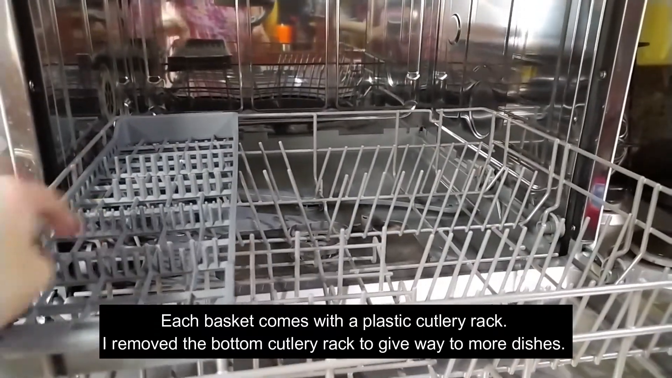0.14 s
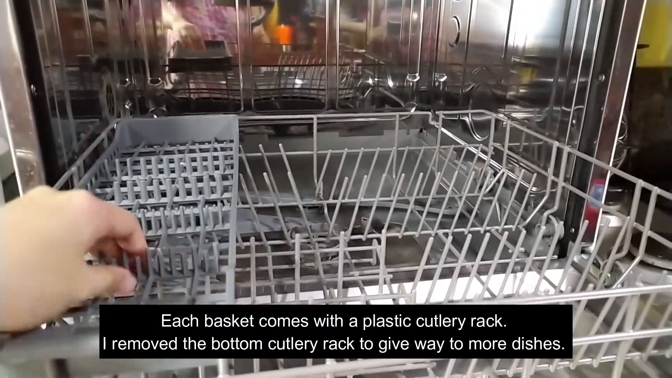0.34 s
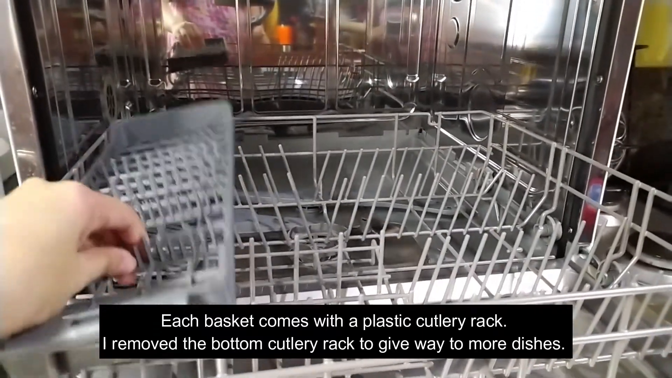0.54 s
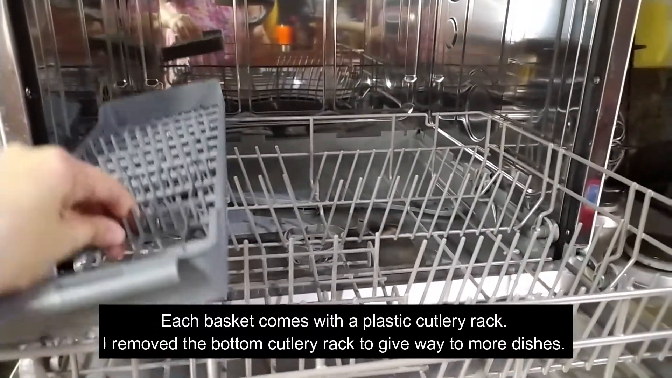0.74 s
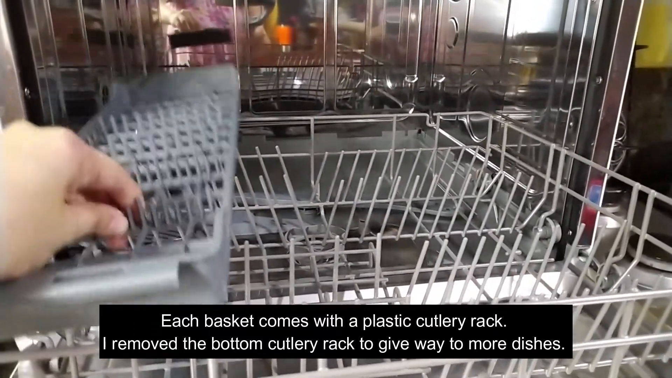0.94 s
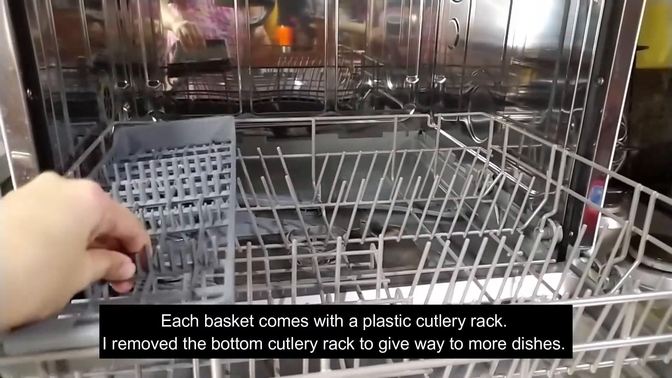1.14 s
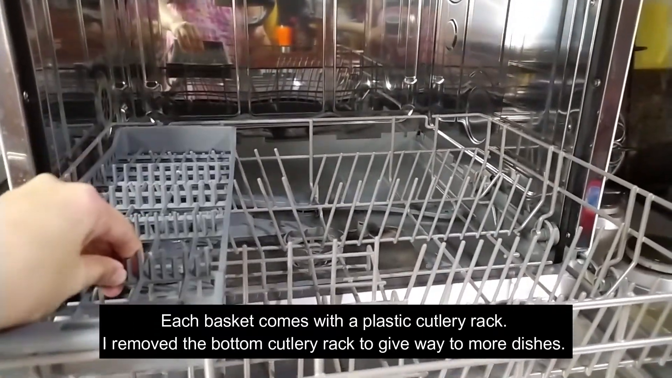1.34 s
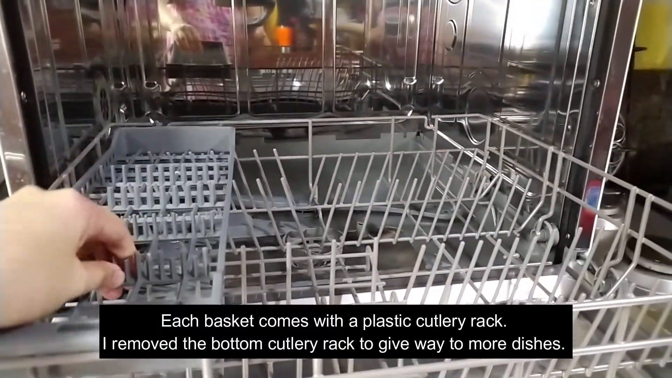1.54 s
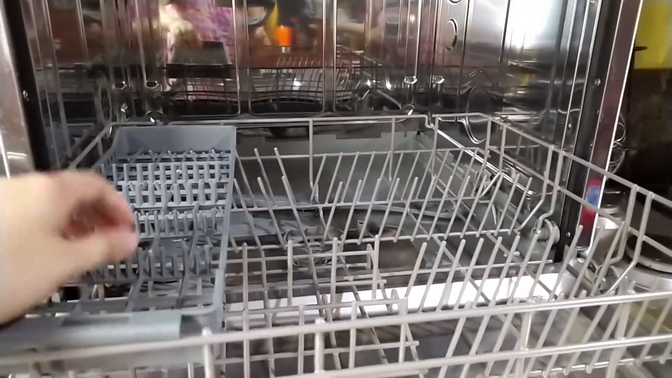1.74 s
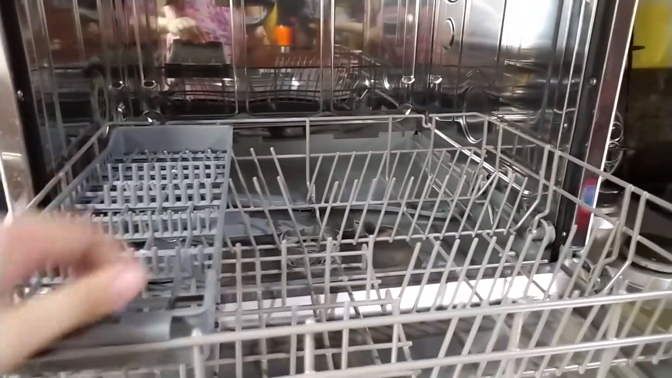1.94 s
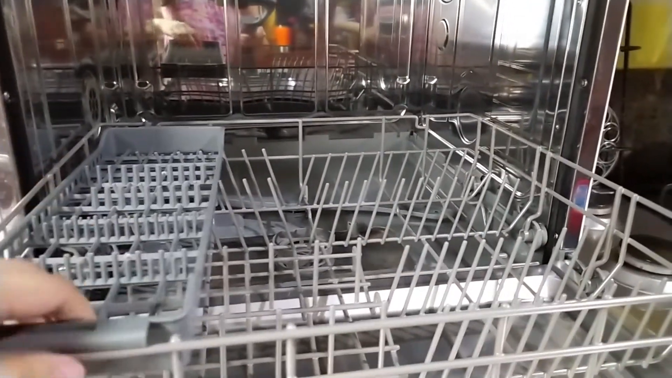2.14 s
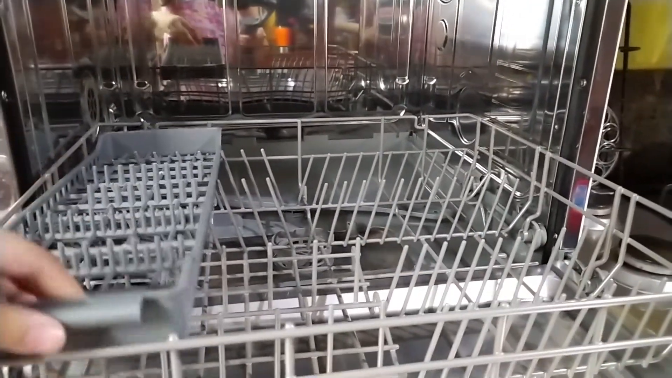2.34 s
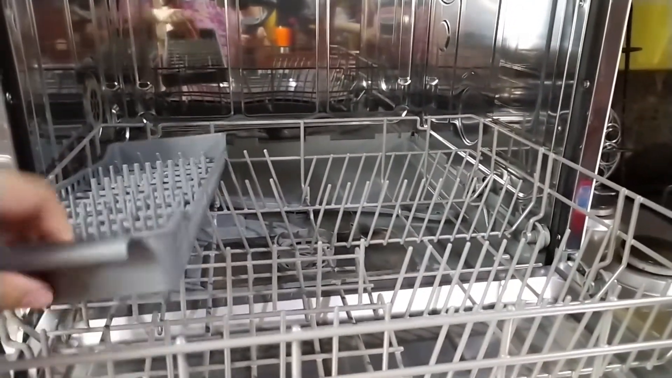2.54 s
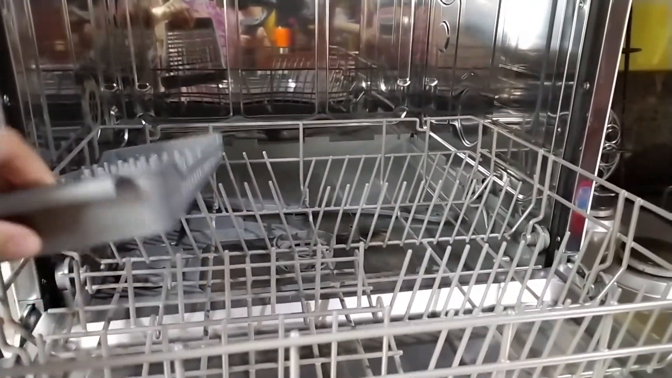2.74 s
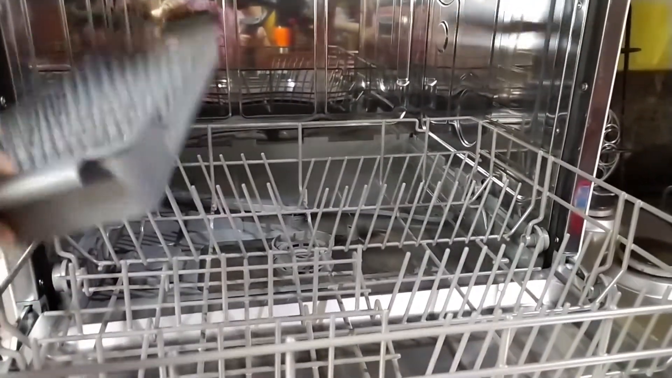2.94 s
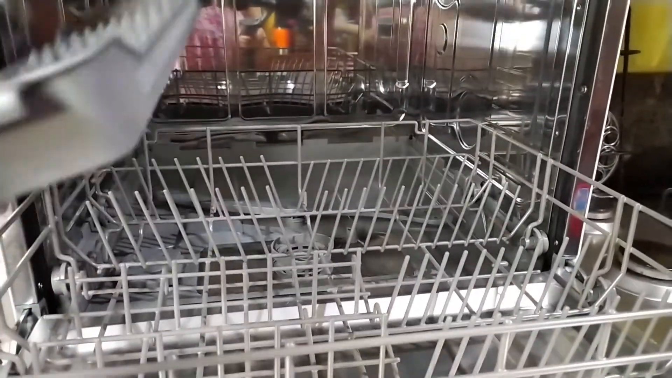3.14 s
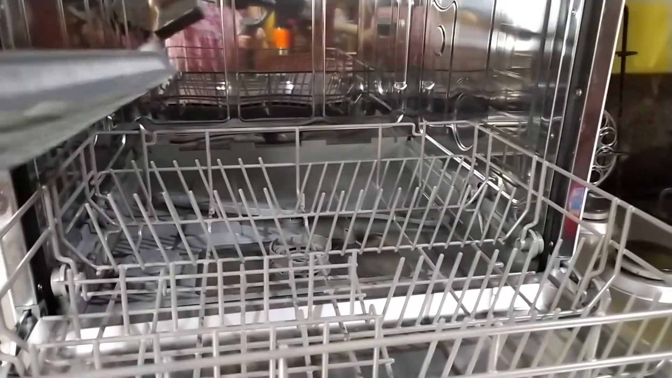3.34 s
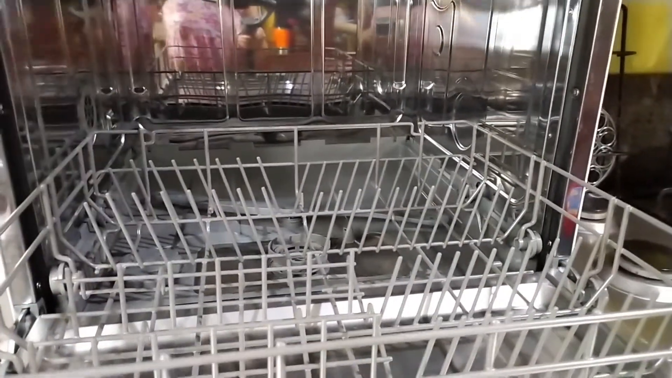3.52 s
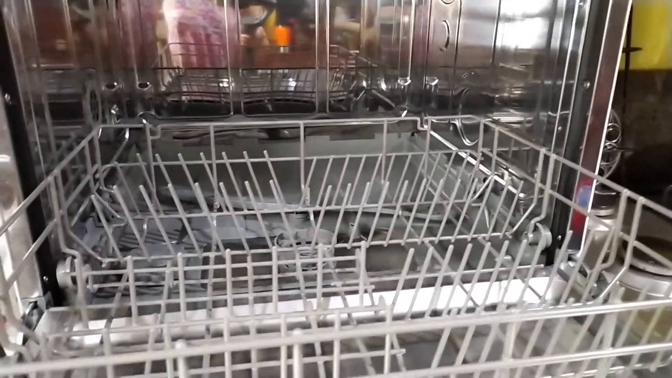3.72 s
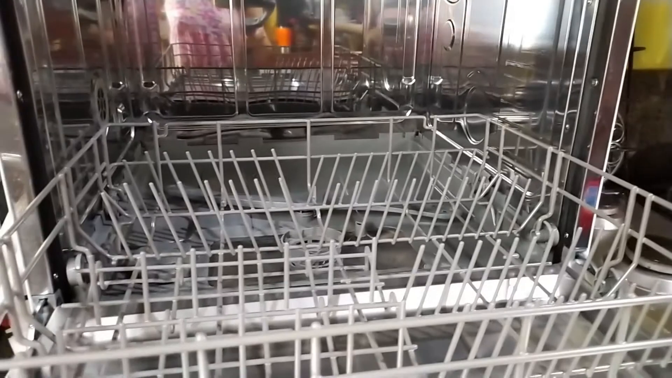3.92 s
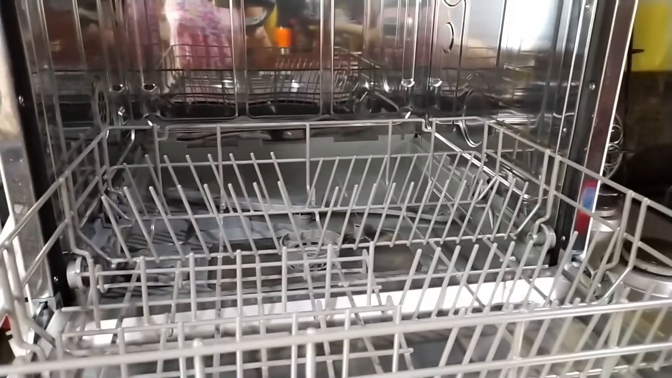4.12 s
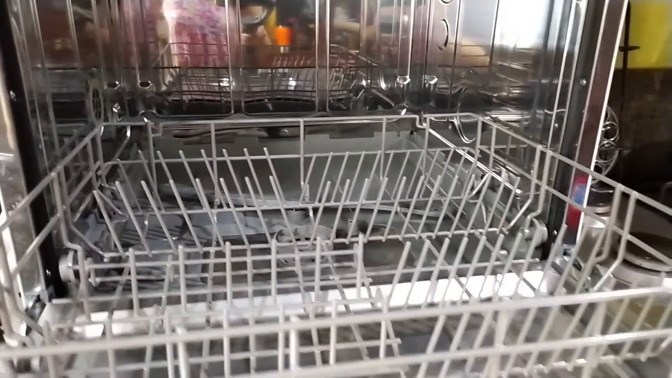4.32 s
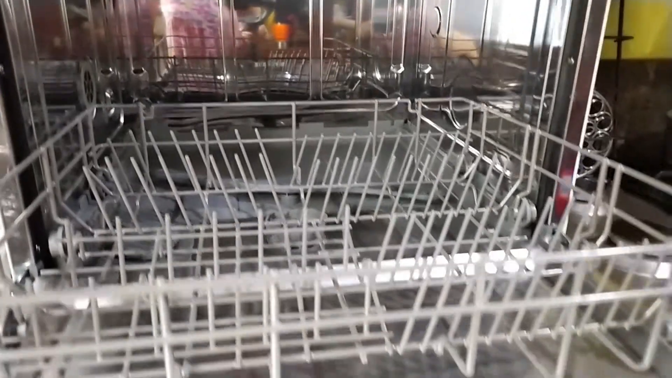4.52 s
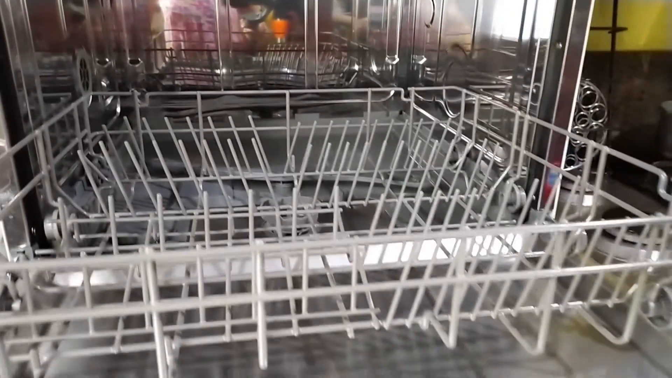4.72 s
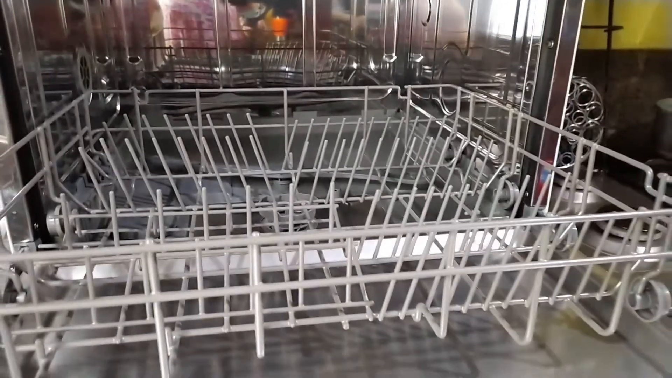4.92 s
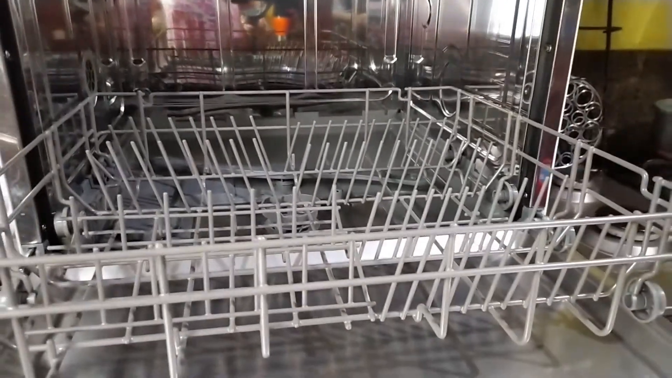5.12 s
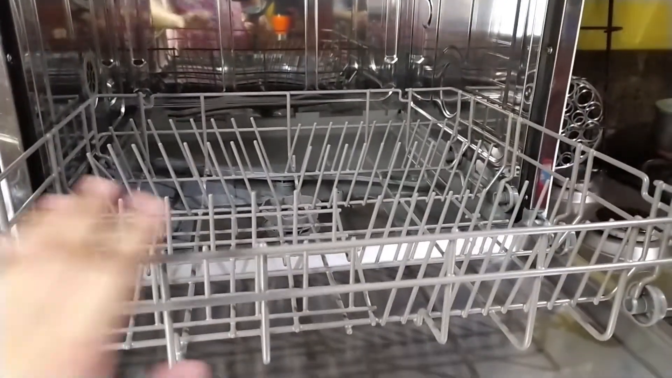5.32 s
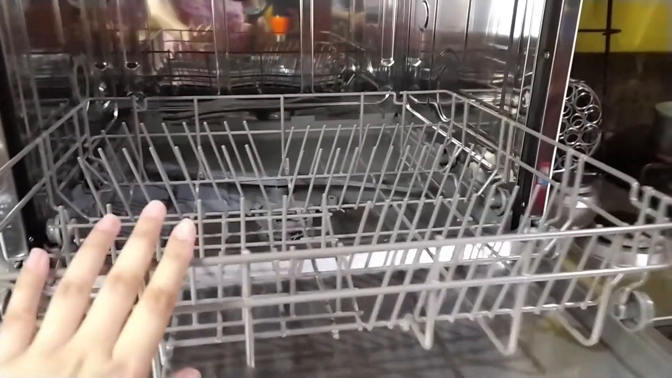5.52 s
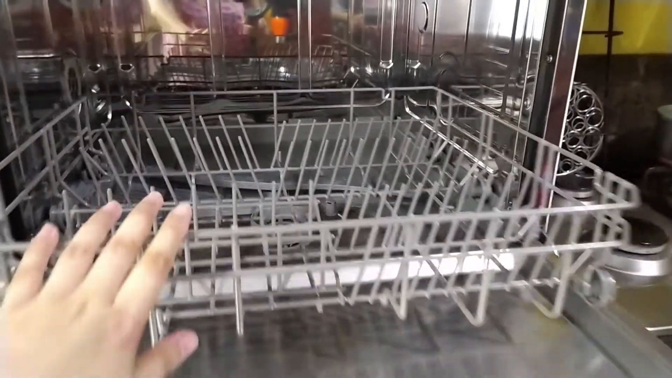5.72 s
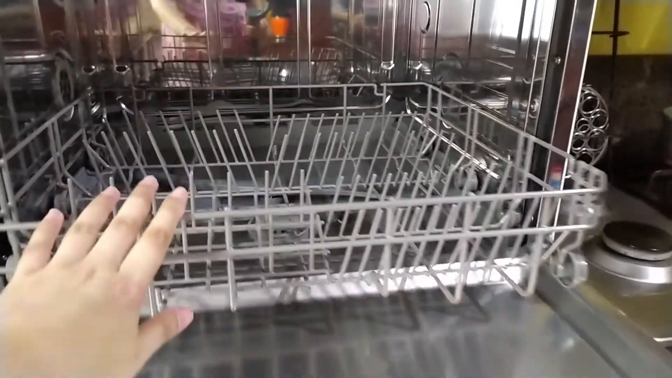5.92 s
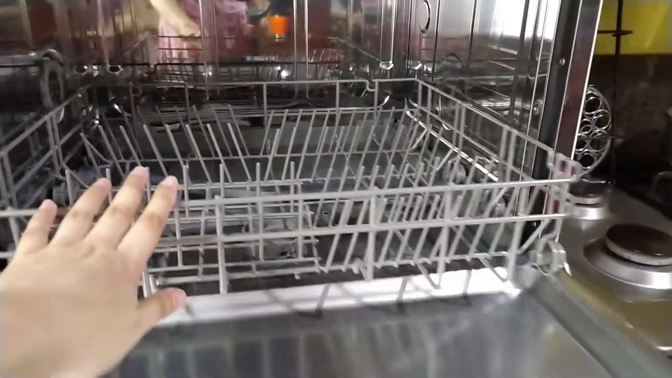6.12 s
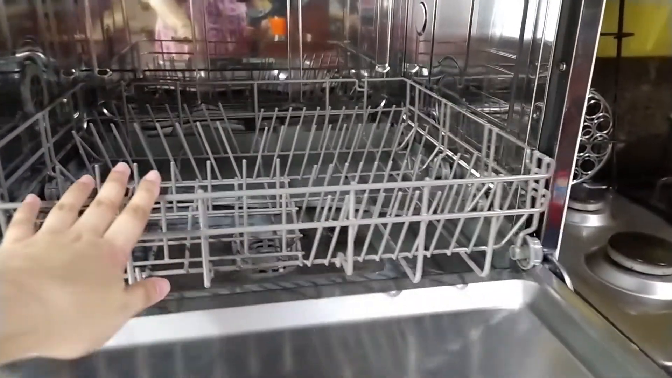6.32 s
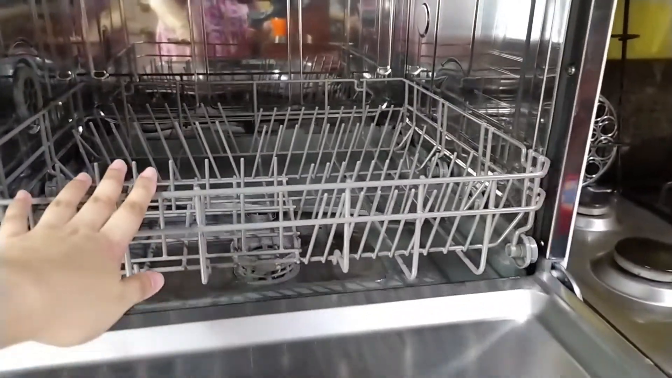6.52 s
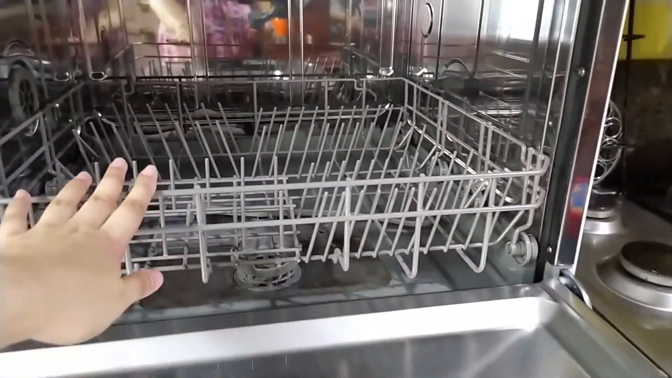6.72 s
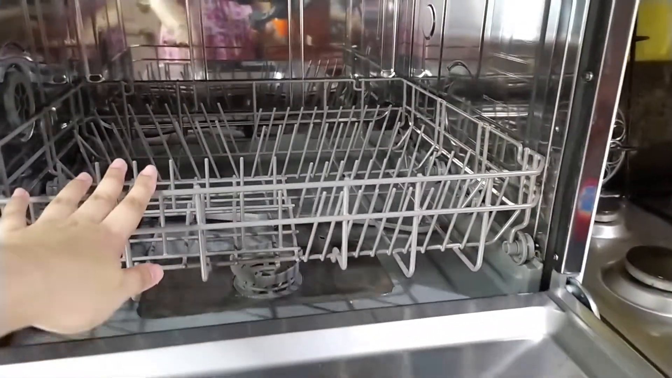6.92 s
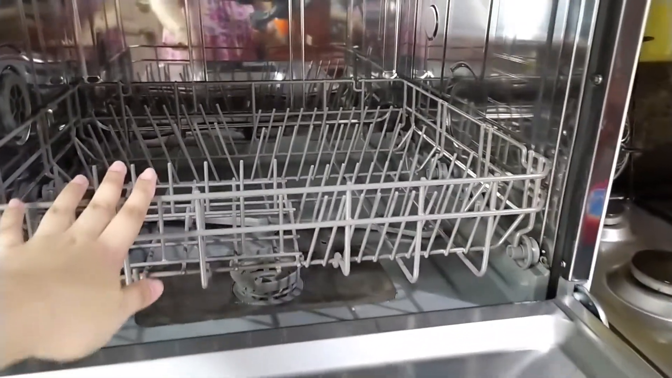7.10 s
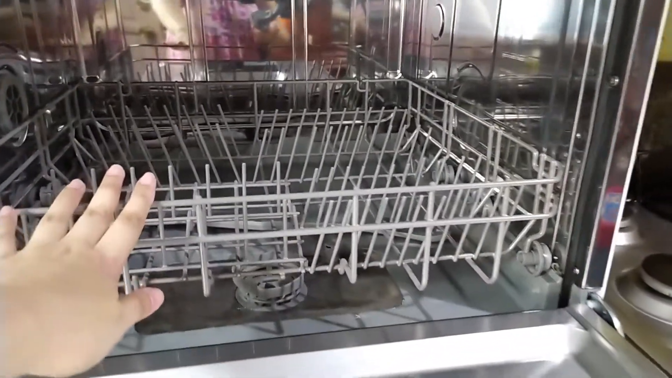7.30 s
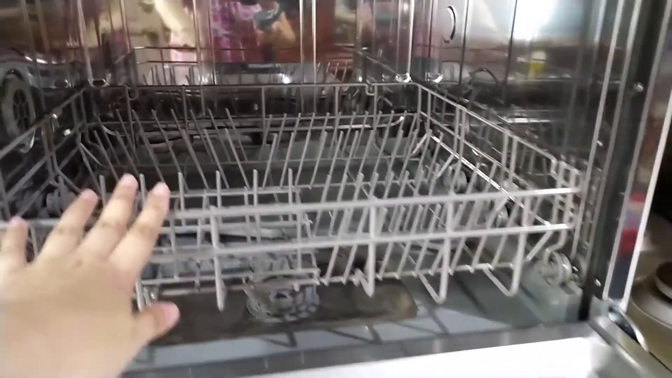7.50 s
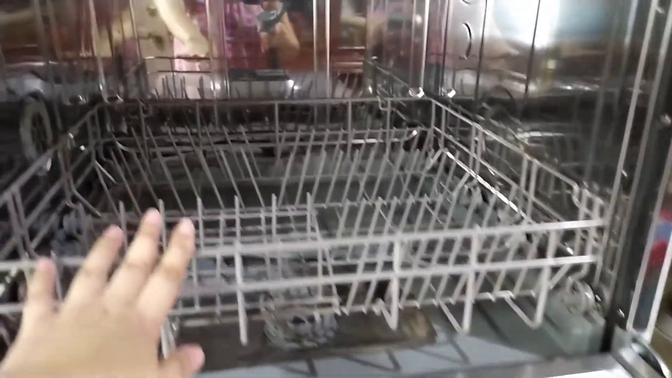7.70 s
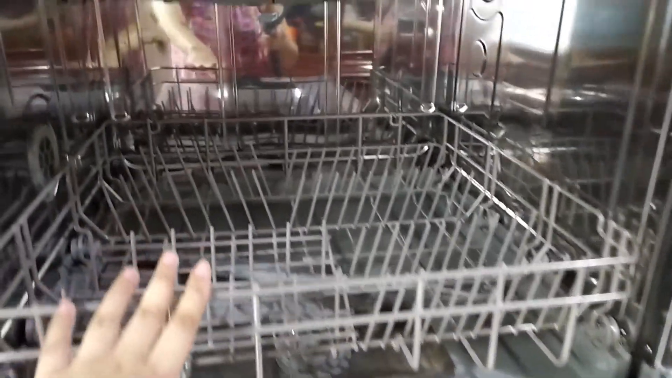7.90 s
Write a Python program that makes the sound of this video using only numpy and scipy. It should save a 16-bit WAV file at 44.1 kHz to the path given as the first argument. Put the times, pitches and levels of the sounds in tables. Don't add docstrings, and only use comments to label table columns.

```python
import sys
import numpy as np
from scipy import signal
from scipy.fft import rfft, irfft, next_fast_len
from scipy.io import wavfile
from scipy.ndimage import uniform_filter1d

SR = 44100
rng = np.random.default_rng(int(sys.argv[2]) if len(sys.argv) > 2 else 0)


def materialize(psi):
    bounded = np.clip(np.atleast_2d(psi).T, -1, 1)
    quanta = np.round(bounded * 32767).astype(np.int16)
    wavfile.write(sys.argv[1], SR, quanta)


def how_loud(loudness_db):
    steps = np.asarray(loudness_db, float) / 20
    return 10 ** steps


N = 355181

# (start [s], length [s], level [dB], weight [dB], hardness [dB])
SCRAPES = [(0.0, 0.012, -51.5, -2, -9.5), (0.565, 0.11, -56, 11, -11), (1.164, 0.25, -57.5, 9, -5),
           (2.01, 0.076, -79, 3, 0), (2.448, 0.17, -56, 7.5, -16), (2.763, 0.2, -51.5, 7, -11.5),
           (3.402, 0.12, -59, -1, 3.5), (4.672, 0.055, -63, -4, -5), (4.9, 0.047, -68, 2, 3.5),
           (5.416, 0.025, -59.5, -2, -4), (6.64, 0.12, -70, 5, -23), (7.114, .1, -57, 2.5, -3.5),
           (7.292, 0.066, -62, -13, 6), (1.545, 0.18, -73, -6, 6), (7.61, 0.055, -48.5, -8, 0),
           (2.266, 0.032, -70.5, -3.5, 14), (7.903, 0.042, -61.5, 0, -5), (7.995, 0.045, -62, 6.5, 3)]
# (time [s], level [dB])
ROLL = [
    (5.48, -65),
    (5.6, -61.5),
    (5.69, -51.5),
    (5.76, -51),
    (5.82, -60.5),
    (5.93, -54),
    (6.02, -55.5),
    (6.08, -50),
    (6.24, -53.5),
]
# (lowest [Hz], highest [Hz], t60 [s], modes against the plain tap [dB], contact burst [s])
PARTS = [
    (125.6, 420, 0.14, -0.5, 0.0061),
    (741, 1260, 0.032, 6.5, 0.0017),
    (1240, 2600, 0.18, -9, .004),
    (2550, 4600, 0.022, 0.5, 0.0043),
    (4500, 15000, .01, -5, 0.0086),
    (375, 640, .05, 1, 0.0033),
]
# (frequency [Hz], level [dB], t60 [s])
TUB_TONES = [(116.6, 2.5, .25), (189, -1.5, 0.14), (298.3, 4.5, 0.3), (390.6, 5.5, 0.091), (447, 1, 0.078)]

# (time [s], peak level [dB], weight [dB], hardness [dB])
TRAY_IN_BASKET = [(0.04, -38.5, -13.5, -15.5), (0.097, -44.5, -4, 0), (0.28, -41.5, -9, -13.5),
                  (0.533, -52.5, -13, -8.5), (0.586, -36, -4, -3), (1.043, -31.5, -10, -18),
                  (1.097, -35, -12.5, 7), (1.123, -31.5, -25, 7), (1.131, -25.5, -6.5, -23),
                  (1.149, -30.5, -12, -21), (1.174, -30.5, -4.5, -30), (1.228, -36.5, -4.5, -3),
                  (1.979, -49.5, -2, 0.5), (2.297, -56, -4.5, 0.5), (2.449, -37.5, -14.5, -10),
                  (2.517, -37.5, -12, -9), (2.739, -63.5, -10, 4.5), (2.774, -44, -11, -6.5),
                  (2.815, -40.5, 1.5, -12)]
# (time [s], peak level [dB], weight [dB], hardness [dB])
TRAY_ON_TUB = [
    (2.993, -25.5, 3, 4.5),
    (2.999, -23.5, -20, -9),
    (3.019, -22.5, -3.5, -30.5),
    (3.041, -47, 4, -24),
]
# (time [s], peak level [dB], weight [dB], hardness [dB])
TRAY_ON_DOOR = [
    (3.273, -22.5, -10.5, -5.5),
    (3.284, -31.5, 7, -18),
    (3.297, -43, 0, -4),
]
# (time [s], peak level [dB], weight [dB], hardness [dB])
TRAY_ON_COUNTER = [
    (4.153, -24, -27, 5.5),
    (4.16, -21.5, -19, -1.5),
    (4.19, -39.5, -19.5, 3),
    (4.347, -37.5, -26.5, 9.5),
    (4.357, -35.5, -11.5, -27.5),
    (4.716, -59, -1.5, 0.5),
]
# (time [s], peak level [dB], weight [dB], hardness [dB])
BASKET = [
    (5.613, -51.5, -15, -19),
    (5.667, -51.5, 4, -13),
    (5.789, -51, -7, -22),
    (5.907, -54, -4, -6),
    (6.059, -36, -12, -8),
    (6.084, -42, -4, -12),
    (6.383, -44, -9, -26),
    (6.64, -52, -3.5, -13),
    (7.595, -50, -3, -3),
]
# (time [s], peak level [dB], weight [dB], hardness [dB])
BASKET_HOME = [
    (6.982, -21.5, -11, -13),
    (6.99, -31.5, 0, -6.5),
]
# (rows, long rods [dB], tray [dB], click [dB], rattle [dB], rattle t60 [s],
# contact length against a hard tap [ratio])
KINDS = [
    (TRAY_IN_BASKET, -4.5, -5, -10, -8.5, 0.19, 1.22),
    (TRAY_ON_TUB, -3.3, -2.5, -7, -10.5, 0.14, 0.87),
    (TRAY_ON_COUNTER, -13, 2.2, -14.5, -14.5, 0.23, 0.77),
    (BASKET, -6, 1, -9, -14, 0.11, 2.4),
    (TRAY_ON_DOOR, 2.05, -7.5, -3.5, -18.5, 0.061, 0.96),
    (BASKET_HOME, -7.5, -1, -10, -20.5, 0.39, 0.67),
]

# (frequency [Hz], kitchen t60 [s], kitchen level [dB], inside of the tub level [dB])
ECHO = [(120, 0.52, -10, -6.5), (196, 0.68, -6, -9), (314, 0.52, -6, -6), (577, 0.41, -3.5, -7.5),
        (1064, 0.41, -4, -6.5), (2000, 0.42, -6, -6.5), (3860, 0.46, -6, -5.5), (7150, 0.51, -7.5, -5)]
# (frequency [Hz], level [dB per Hz])
ROOM_TONE = [(30, -44.5), (60, -28), (110, -6.5), (200, -7.5), (450, -11), (1200, -12), (1700, -20.5),
             (3300, -21), (4300, -26.5), (5200, -29), (7000, -38), (9500, -31), (10600, -35),
             (11500, -73.5)]
# (frequency [Hz], width [Hz], level [dB])
HUM = [(118.6, 3.4, -84.5), (202.8, 2.6, -77.5), (289, 14, -82)]
CLOCK_BEATS_DB = [-63, -60.5, -66.5, -63]
# (frequency [Hz], level [dB])
CLOCK_COLOUR = [(6800, -11), (7600, 1.5), (8300, 0), (9000, 1.5), (9700, 9.5), (10600, -9), (11200, -12.5)]
# (time [s], peak level [dB])
WIRE_TICKS = [
    (2.5022, -50),
    (2.611, -59),
    (3.4774, -51),
    (5.5666, -59.5),
    (6.779, -59),
    (6.835, -69),
]
# (frequency [Hz], level [dB])
MIC = [(40, -33.5), (85, -10), (118, -2), (330, -4.5), (1300, -7.5), (4000, -4.94), (4400, -11), (6600, -9),
       (9600, -6.5), (10800, -19), (11300, -56.5)]


def colour(x, points):
    size = next_fast_len(len(x))
    hz, db = np.transpose(points)
    bins_hz = np.arange(size // 2 + 1) * SR / size
    gain = how_loud(np.interp(np.log(bins_hz + 1), np.log(hz), db))
    return irfft(rfft(x, size) * gain, size)[:len(x)]


def level(x, db):
    return x * how_loud(db) / np.sqrt(np.mean(x ** 2))


def band(x, lo_hz, hi_hz):
    sos = signal.butter(3, [lo_hz, min(hi_hz, SR / 2.1)], "band", fs=SR, output="sos")
    return signal.sosfilt(sos, x)


def through(x, response):
    return signal.oaconvolve(x, response)[:N]


def walk(rate):
    hold = int(SR / rate)
    steps = np.repeat(rng.standard_normal(N // hold + 1), hold)
    return 1.4 * uniform_filter1d(steps, hold)[:N]


def ring(modes, size=SR // 3):
    hz, db, t60 = np.transpose(modes)[:, :, None]
    t = np.arange(size) / SR
    sense = rng.choice([-1, 1], (len(hz), 1))
    y = np.sum(sense * how_loud(db - 60 * t / t60) * np.sin(2 * np.pi * hz * t), axis=0)
    return y / np.sqrt(np.sum(y ** 2))


def bodies():
    taps, out = [], []
    for k, (lo_hz, hi_hz, t60, modes_db, _) in enumerate(PARTS):
        is_tub = k == 0
        place, size, life = rng.random((3, 24))
        hz = lo_hz * (hi_hz / lo_hz) ** ((np.arange(len(place)) + place) / len(place))
        modes = list(zip(hz, -6 * size - 8 * is_tub, t60 * (0.5 + life)))
        rings = ring(modes + (list(TUB_TONES) if is_tub else []))
        tap = band(signal.unit_impulse(len(rings)), lo_hz, hi_hz)
        tap = tap / np.sqrt(np.sum(tap ** 2))
        taps.append(tap)
        out.append(tap + how_loud(modes_db) * rings)
    return taps, out


def shares(db, weight_db, hard_db, rods_db, tray_db, click_db):
    tray = tray_db + 0.38 * hard_db
    return db + np.array([weight_db, 0 * db, tray, hard_db, click_db + hard_db, rods_db + 0 * db])


def air():
    tone = level(colour(rng.standard_normal(N), ROOM_TONE), -71) * how_loud(walk(2.624))
    hum = sum(level(band(rng.standard_normal(N), hz - width / 2, hz + width / 2), db) for hz, width, db in HUM)
    return tone + hum


def motion():
    scrape_mix_db, roll_mix_db = (-6, -1.5, -3.5), (-4, -2.5, -0.5)
    attack_share, release_t60_s = 0.71, 0.16
    rattle_s, rattle_weight_db, rattle_hardness_db = 0.008, 6, 3.5
    t = np.arange(N) / SR
    s, db = np.transpose(ROLL)
    roll_db = np.interp(t, s, db, -200, -200)
    rub = how_loud(shares(roll_db, -2 + 0 * t, -15.5 + 0 * t, *roll_mix_db))
    moves = []
    for s, hold, db, weight, hard in SCRAPES:
        moves.append((s, attack_share * hold, hold, release_t60_s, shares(db, weight, hard, *scrape_mix_db)))
    for rows, *mix_db, rattle_db, t60, _ in KINDS:
        for s, db, weight, hard in rows:
            part_db = shares(db + rattle_db, weight + rattle_weight_db, hard + rattle_hardness_db, *mix_db)
            moves.append((s, rattle_s, rattle_s, t60, part_db))
    for s, attack, hold, t60, db in moves:
        now = slice(int(max(s, 0) * SR), int((s + hold + t60) * SR))
        age = t[now] - s
        rise = np.clip(age / attack, 0, 1)
        fade = how_loud(-60 * np.maximum(age - hold, 0) / t60)
        rub[:, now] += how_loud(db)[:, None] * rise * fade
    return rub


def slides(body):
    caught = rng.random(N) < 3500 / SR * how_loud(3.5 * walk(45))
    slips = caught * how_loud(0.61 * rng.exponential(size=N)) * rng.choice([-1, 1], N)
    energy = np.sqrt([np.sum(response ** 2) for response in body])
    return motion() * how_loud(-1) * slips / np.std(slips) / energy[:, None]


def knocks(body):
    times = np.concatenate([np.transpose(kind[0])[0] for kind in KINDS])
    share_db = np.hstack([shares(*np.transpose(rows)[1:], *mix_db) for rows, *mix_db, _, _, _ in KINDS])
    soft = np.concatenate([[kind[-1]] * len(kind[0]) for kind in KINDS])[:, None]
    t = np.arange(1024) / SR
    force, blow = np.zeros((2, len(body), N + len(t)))
    for k, response in enumerate(body):
        burst_s = PARTS[k][4]
        decay = np.exp(-t / soft / burst_s)
        onset = 1 - np.exp(-t / (0.069 * soft ** 2 * burst_s))
        contacts = rng.standard_normal((len(times), len(t))) ** 3 * decay * onset
        heard = signal.fftconvolve(contacts, response[None, :2048], axes=1)
        peak = np.sqrt(uniform_filter1d(heard ** 2, size=256, axis=1).max(axis=1))
        for s, gain, sound, burst in zip(times, how_loud(share_db[k]) / peak, heard, contacts):
            start = int(s * SR)
            force[k, start:start + len(t)] += gain * burst
            blow[k, start] += gain * np.sqrt(np.sum(sound ** 2))
    return force[:, :N], blow[:, :N]


def kitchen():
    t = np.arange(SR * 3 // 4) / SR
    tail = 0
    for hz, tiles_t60, tiles_db, tub_db in ECHO:
        for t60, db, build_s in ((tiles_t60, tiles_db, 0.006), (0.17, tub_db, 0.0015)):
            noise = band(rng.standard_normal(len(t)), hz / 1.394, hz * 1.415)
            part = noise * how_loud(-60 * t / t60) * (1 - np.exp(-t / build_s))
            tail = tail + how_loud(db) * part * np.sqrt(hz / SR / np.sum(part ** 2))
    return tail * 1.443


def clock(room):
    times = 0.1875 + 0.2498 * np.arange(32)
    rows = [(s, CLOCK_BEATS_DB[k % 4]) for k, s in enumerate(times)]
    rows += [(s, db - 4.5) for s, db in WIRE_TICKS]
    scatter = np.exp(-np.arange(512) / SR / 0.0054)
    force = np.zeros(N + 512)
    for (s, db), burst in zip(rows, rng.standard_normal((len(rows), 512))):
        start = int(s * SR)
        force[start:start + 512] += burst * scatter * how_loud(db)
    ticks = colour(force[:N], [(5000, -52)] + list(CLOCK_COLOUR) + [(12000, -64)])
    return 0.56 * ticks + 0.65 * through(ticks, room)


def noise_suppression(near, background):
    fall_s, threshold_db, slope, top_db, on_tails = 0.03, -76.5, 0.35, 9, 0.86
    fall = np.exp(-1 / (fall_s * SR))
    loud_db = 10 * np.log10(signal.lfilter([1 - fall], [1, -fall], near ** 2) + 1e-12)
    open_db = np.clip(slope * (loud_db - threshold_db), 0, top_db)
    return near * how_loud(on_tails * (open_db - top_db)) + how_loud(open_db) * background


def scene():
    taps, body = bodies()
    room = kitchen()
    force, blow = knocks(body)
    slide = slides(body)
    direct = sum(map(through, force + slide, body))
    to_walls = sum(map(through, blow + slide, body[:1] + taps[1:]))
    near = colour(direct + through(to_walls, room), MIC)
    return noise_suppression(near, air() + clock(room))[None]


def top_cut(x):
    return signal.sosfilt(signal.butter(12, 11330, fs=SR, output="sos"), x)


def record(dry):
    return top_cut(dry)


dry = scene()
out = record(dry)
materialize(out)
```